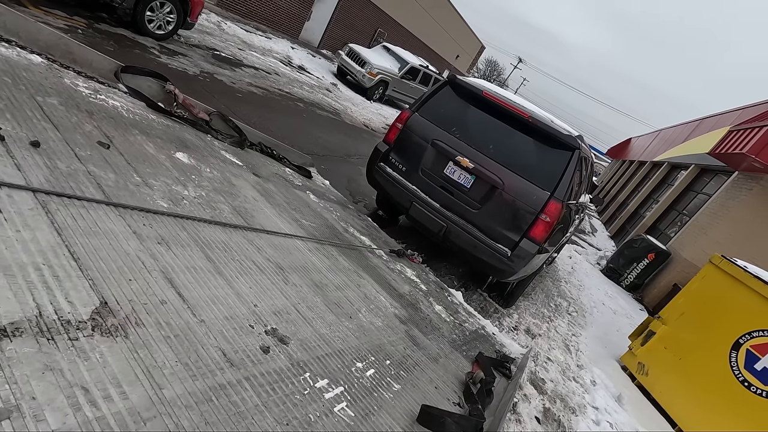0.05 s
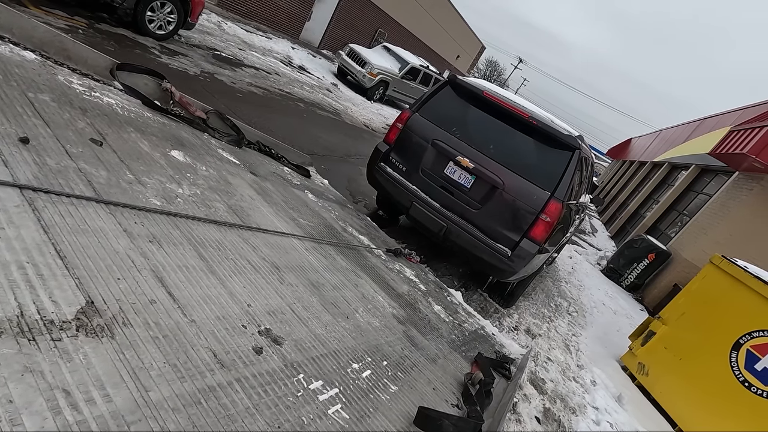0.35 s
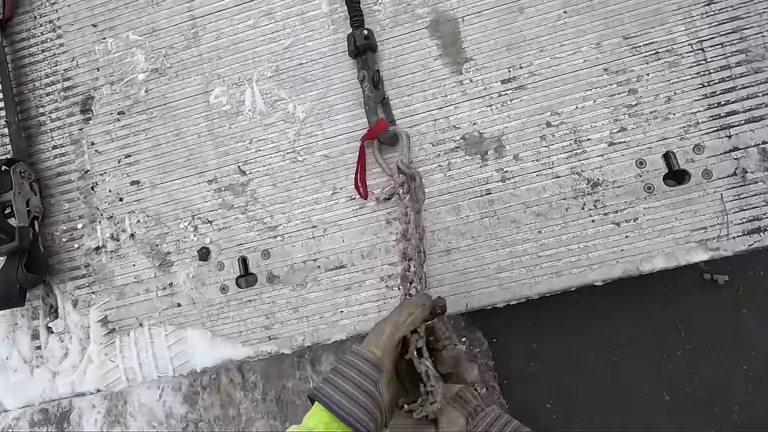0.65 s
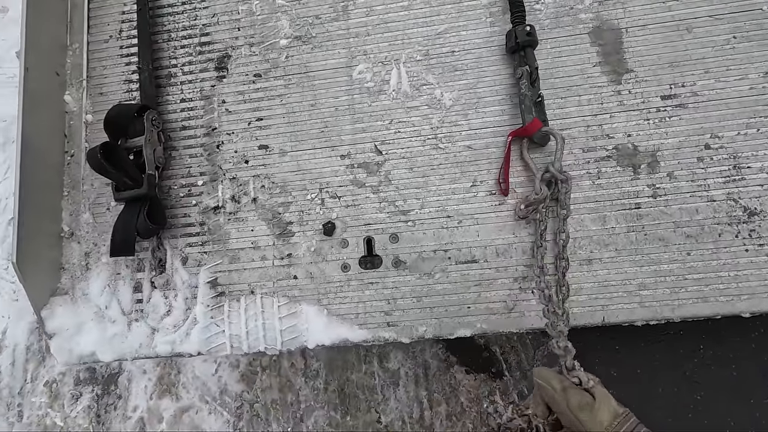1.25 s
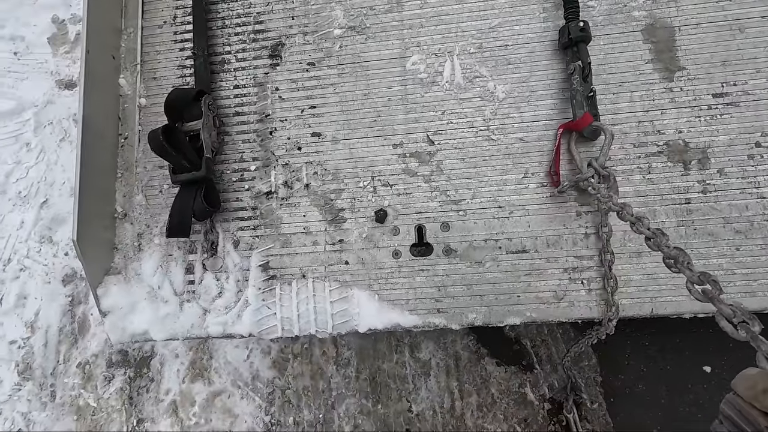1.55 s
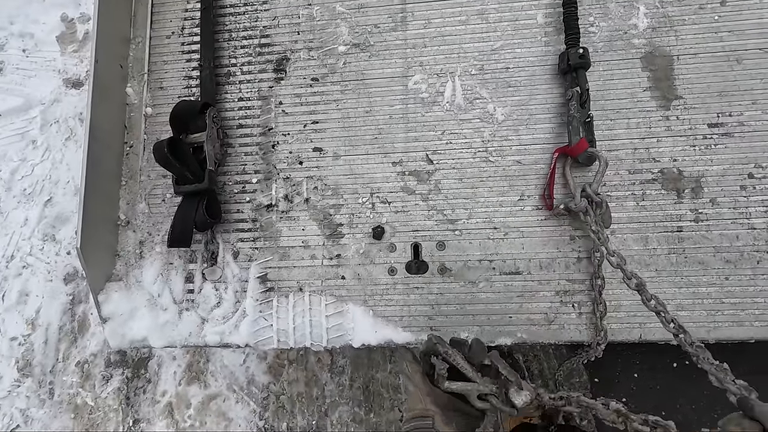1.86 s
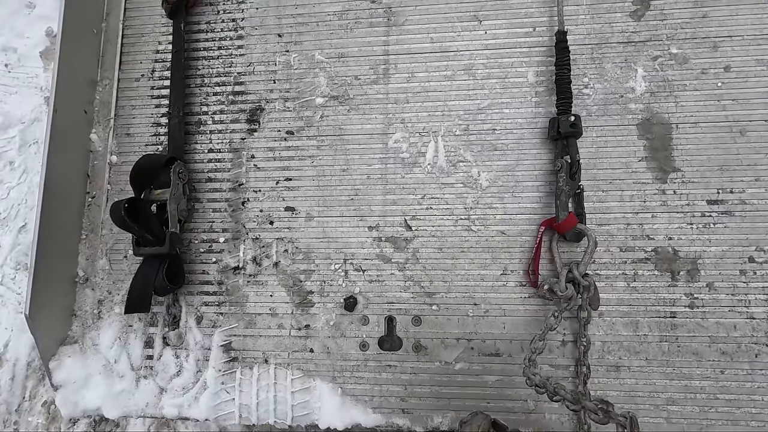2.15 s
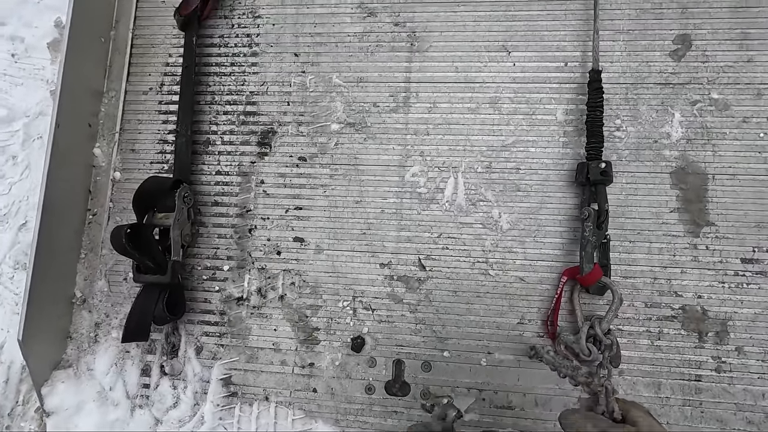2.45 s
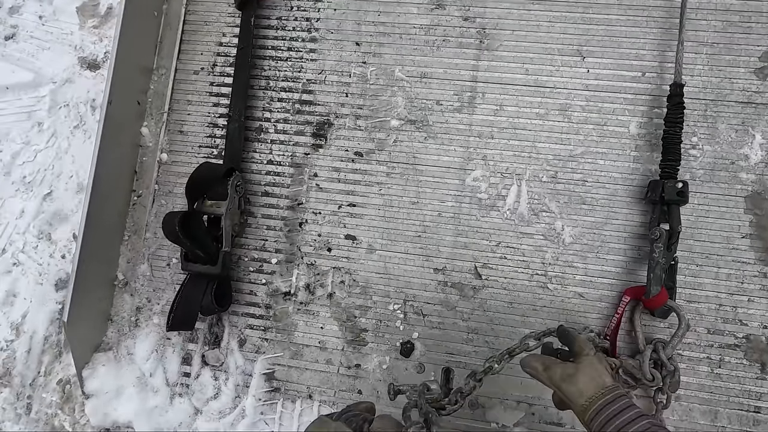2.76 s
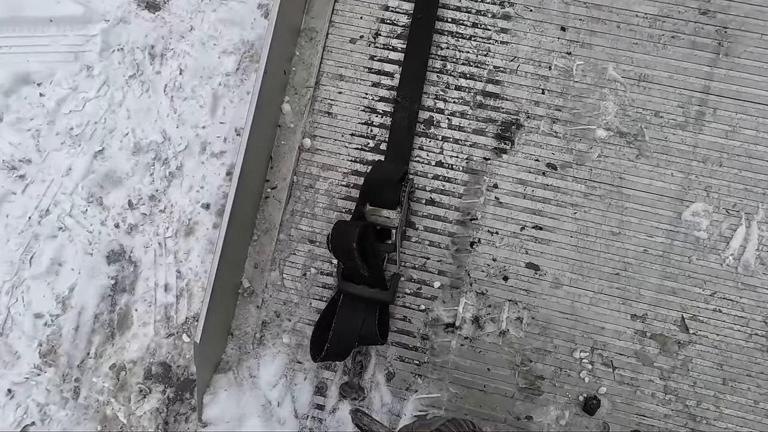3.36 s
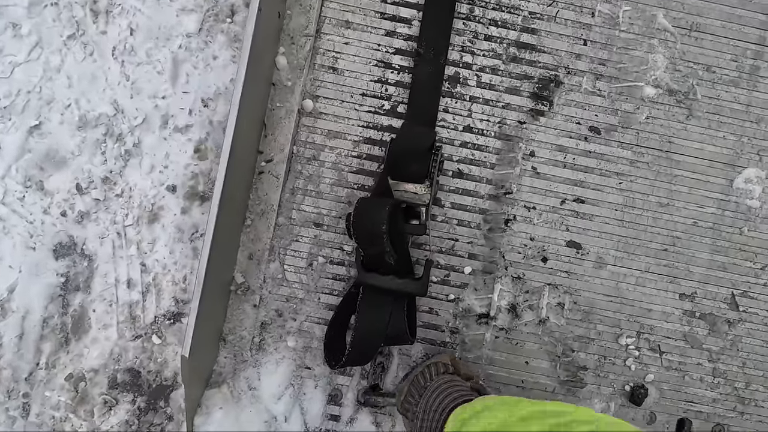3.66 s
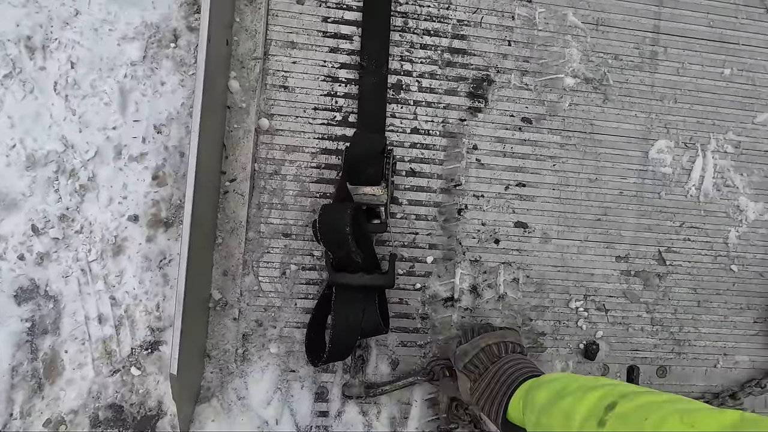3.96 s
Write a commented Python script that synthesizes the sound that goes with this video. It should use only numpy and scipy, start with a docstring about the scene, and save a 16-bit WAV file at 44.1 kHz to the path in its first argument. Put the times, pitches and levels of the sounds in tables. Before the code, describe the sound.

A steel chain clinks and knocks on a truck's metal bed, close by outdoors. A whining pump cuts out at the start, leaving a low engine drone; links ring, slide rattling over the ribbed deck, then clunk down.

```python
"""A steel tie-down chain clinks, knocks and rattles on the ribbed metal bed of an idling truck, outdoors.
Links ring against each other, the hook and slack hit the deck, and the chain slides through gloves
and over the ribs. For the first half second the engine and its whining hydraulic pump are near;
then they drop to a low drone."""
import sys
import numpy as np
from scipy import signal
from scipy.io import wavfile

SR = 44100
rng = np.random.default_rng(int(sys.argv[2]) if len(sys.argv) > 2 else 0)


def wav_record(signal):
    """Record a signal, one row per channel, as 16-bit PCM in the file named by sys.argv[1]."""
    frames = np.transpose(np.atleast_2d(signal))
    bounded = np.clip(frames, -1, 1)
    # unit amplitude maps onto the largest positive 16-bit level
    quanta = np.round(bounded * 32767).astype(np.int16)
    wavfile.write(sys.argv[1], SR, quanta)


N = 176400
TIME_S = np.arange(N) / SR

# Link modes. Each row: frequency in Hz, free T60 in seconds, level in dB struck flat, on edge, at the tip.
LINK_MODES = [(4095, .10, 0, -18, -24), (4280, .09, -22, -4, -18), (4352, .12, -24, -3, -11),
              (5640, .09, -11, -26, -28), (5820, .14, -16, -2, -22), (6605, .14, -9, -15, -22),
              (7860, .13, -7, -19, -14), (8175, .05, -22, -24, -1), (8540, .05, -22, -14, 0),
              (9860, .12, -32, -16, -20), (11180, .13, -24, -24, -26), (14140, .11, -46, -31, -36),
              (15540, .09, -48, -42, -17)]
# Link on link. Each row: start in seconds, level in dB, tilt in dB per octave, blow (flat, edge or tip).
LINK_HITS = [(0.769, -29, 0, "edge"), (0.792, -41, 5, "tip"), (0.926, -36, -14.5, "tip"),
             (1.236, -38, -6.5, "edge"), (1.503, -50, 13.5, "flat"), (1.713, -19.5, -5, "flat"),
             (1.750, -15.5, -5, "edge"), (1.759, -28.5, 6, "edge"), (1.875, -20.5, -17.5, "tip"),
             (1.889, -18, -10.5, "flat"), (1.946, -40, -8, "edge"), (2.166, -29.5, 5, "tip"),
             (2.298, -30, -59, "edge"), (2.570, -49, 17.5, "flat"), (2.734, -31, 5, "flat"),
             (3.099, -17.5, -21, "edge"), (3.102, -25.5, 13, "flat"), (3.653, -27, 1, "tip")]
# Swings of the loose chain. Each row: centre in seconds, spread in seconds, level in dB.
CHAIN_SWINGS = [(0.809, 0.061, -46.5), (2.158, 0.062, -50), (2.858, 0.12, -40.5), (3.698, .03, -44)]
# Hook and slack on the deck. Each row: start in seconds, then mid, bass, treble and top levels in dB.
DECK_KNOCKS = [(0.712, -5.5, -11, -21, -24), (0.726, -1.5, -26, -25.5, -19), (0.739, -8, -8, -36, -37),
               (0.793, -7.5, -9.5, -26, -35), (0.98, -1.5, -14, -18.5, -35), (1.550, -7, -22.5, -38.5, -45),
               (1.759, -3.5, -19, -36.5, -18), (2.9541, -18, -15, -13.5, -5.5),
               (3.66, 2.5, -10.5, -26, -21), (3.696, -11, -34, -24.5, -14.5), (3.727, -3.5, -28, -28, -25),
               (3.782, -0.5, -14.5, -31, -30.5), (3.915, -1.5, -23.5, -37, -53),
               (3.934, -4, -46, -32.5, -31), (3.973, -12.5, -25, -24, -61)]
# Spectrum common to all knocks. Each row: frequency in Hz, gain in dB.
KNOCK_EQ = [(60, -3), (180, 4.5), (350, 1), (800, -11), (1300, -5), (2600, 1.5), (5000, -15.5),
            (9000, -26.5), (14000, -39)]
# Decay of the deck's dense ring. Each row: frequency in Hz, T60 in seconds.
DECK_DECAY = [(100, 0.41), (1200, 0.18), (3000, 0.13), (12000, 0.092)]
# Deck plate modes. Each row: frequency in Hz, gain in dB, T60 in seconds.
PLATE_MODES = [(173.3, -2, 0.17), (184.6, -2.5, 0.15), (770, -31, 0.54), (1260, -12.5, 0.15)]
# Single links on the deck. Each row: start in seconds, treble level in dB, top level in dB.
DECK_TAPS = [(0.59, -24, -18), (0.685, -19, -14.5), (0.882, -18, -27), (2.5477, -11, -21.5),
             (2.5692, -12.5, -22), (2.7503, -10, -20), (2.7883, -13, -15), (2.834, -6.5, -11.5),
             (2.856, -5.5, -12.5), (2.929, -30, -17), (3.0731, -17.5, -18), (3.1313, -13, -11),
             (3.1955, -15, -25), (3.2153, -17.5, -20), (3.4532, -25, -61), (3.6046, -13, -22.5)]
# Spectrum common to all taps. Each row: frequency in Hz, gain in dB.
TAP_EQ = [(150, -14.5), (800, -8.5), (3000, -12), (5000, -10.5), (9000, -26), (14000, -43)]
# Envelope of the chain's slide. Each row: time in seconds, level in dB.
DRAG_LEVEL = [(.67, -56), (.72, -31), (.92, -45), (1.08, -70), (2.73, -80), (2.76, -25), (2.85, -27.5),
              (2.91, -30), (2.98, -28.5), (3.22, -29.5), (3.27, -36.5), (3.55, -75)]
# Spectrum of the slide. Each row: frequency in Hz, relative density in dB.
DRAG_EQ = [(150, 19), (600, 7), (2000, 8.5), (3500, 6), (9000, -21), (15500, -24)]
# Engine orders and pump whine. Each row: frequency in Hz, near level in dB, far level in dB.
TRUCK_TONES = [(60.34, -32.5, -34.5), (68.5, -31, -40.5), (118, -71, -35), (150.1, -34, -44.5),
               (284, -26.5, -33), (470, -31.5, -64.5), (568.6, -36, -42.5), (956, -30, -52.5)]
# Pump resonances. Each row: centre in Hz, width in Hz, level in dB.
PUMP_BANDS = [(933, 120, -29.5), (1395, 87, -41.5), (1955, 71, -42.5), (2590, 770, -41.5), (7080, 920, -58),
              (9300, 9900, -62)]
# Near rumble. Each row: frequency in Hz, relative density in dB.
NEAR_EQ = [(15, -48), (25, -6), (64, 0), (250, -4.5), (673, -15), (1100, -17), (2780, -26.5), (15000, -106)]
# Far rumble. Each row: frequency in Hz, relative density in dB.
FAR_EQ = [(15, -31), (25, -2), (125, -4), (243, -12.5), (420, -13), (573, -20), (879, -19), (3830, -36.5),
          (15000, -85)]

BAND_EDGES_HZ = 22 * 2 ** np.arange(0, 9.7, 1 / 3)
NEIGHBOUR_DETUNE = 0.046


def clinks(chatter_s=0.0036, chatter_loss_db=3, chatter_detune=0.0037, jostle_s=0.007, jostle_db=-13.5):
    """A struck link chatters in the modes the blow favours and jostles its detuned neighbours."""
    out = np.zeros(N + SR)
    hz, t60_s, flat_db, edge_db, tip_db = np.transpose(LINK_MODES)
    blow_db = {"flat": flat_db, "edge": edge_db, "tip": tip_db}
    for start_s, db, tilt_db, blow in LINK_HITS:
        gains = from_db(db + blow_db[blow] + tilt_db * np.log2(hz / hz[0]))
        chatter = [(chatter_s * k * (1 + rng.random() / 2), -chatter_loss_db * k, chatter_detune)
                   for k in range(4)]
        jostle = [(rng.exponential(jostle_s), jostle_db, NEIGHBOUR_DETUNE) for _ in range(7)]
        for delay_s, touch_db, detune in chatter + jostle:
            wave = link_ring(hz, t60_s, gains * from_db(touch_db), detune)
            start = int((start_s + delay_s) * SR)
            out[start:start + len(wave)] += wave
    return out[:N]


def link_ring(hz, t60_s, gains, detune, glove_t60_ratio=0.64, tick_db=-9.5):
    """One touch: glove-damped link modes plus a contact tick."""
    t = TIME_S[:SR // 5]
    tuned_hz = hz * (1 + detune * rng.standard_normal(len(hz)))
    decay = np.exp(-np.log(1000) * t / (glove_t60_ratio * t60_s[:, None]))
    modes = np.sin(2 * np.pi * (tuned_hz[:, None] * t + rng.random((len(hz), 1)))) * decay
    tick = band(rng.standard_normal(len(t)), 2300, 8000) * np.exp(-t / 0.0029)
    attack = 1 - np.exp(-t / 0.00045)
    return (gains @ modes + 2 * from_db(tick_db) * np.linalg.norm(gains) * tick) * attack


def knocks(gain_db=13, crack_t60_s=0.011, tail_db=-5, push_db=19, hook_db=5.5):
    """Hook and slack land: a sharp push and a crack, then the deck rings and the hook sounds a few damped
    tones."""
    start_s, mid_db, bass_db, treble_db, top_db = np.transpose(DECK_KNOCKS)

    def envelope(hz):
        db = [np.interp(np.log(hz), np.log([250, 800, 2500, 6000]), row)
              for row in zip(bass_db, mid_db, treble_db, top_db)]
        hits = clicks(start_s, from_db(np.array(db) + at_hz(KNOCK_EQ, hz) + gain_db))
        return hit_decay(hits, crack_t60_s) + from_db(tail_db) * hit_decay(hits, at_hz(DECK_DECAY, hz))

    plate = 0
    for k, (hz, db, t60_s) in enumerate(PLATE_MODES):
        sizes = from_db(bass_db + db + rng.standard_normal(len(start_s)))
        plate += (-1) ** k * ring(clicks(start_s, sizes), hz, t60_s)
    push = band(clicks(start_s, from_db(treble_db + push_db)), 400, 3500)
    return banded_noise(envelope) + plate + push + metal_tones(start_s, treble_db + hook_db)


def taps(gain_db=14, tick_t60_s=0.0024, tail_db=-8.5, tail_t60_s=0.12):
    """Single links hit the deck lightly: a dry tick, a short tail, a few damped tones."""
    start_s, treble_db, top_db = np.transpose(DECK_TAPS)

    def envelope(hz):
        db = [np.interp(np.log(hz), np.log([2500, 6000]), row) for row in zip(treble_db, top_db)]
        hits = clicks(start_s, from_db(np.array(db) + at_hz(TAP_EQ, hz) + gain_db))
        return hit_decay(hits, tick_t60_s) + from_db(tail_db) * hit_decay(hits, tail_t60_s)

    return banded_noise(envelope) + metal_tones(start_s, treble_db)


def metal_tones(starts_s, levels_db, range_hz=(1574, 3920), t60_s=0.034, gain_db=-10):
    """Three damped tones, different at every hit."""
    out = 0
    for start_s, db in zip(starts_s, levels_db):
        hit = clicks([start_s], [from_db(db + gain_db)])
        for k, hz in enumerate(rng.uniform(*range_hz, size=3)):
            out += (-1) ** k * ring(hit, hz, t60_s)
    return out


def drag(contacts_per_s=400, rattle_t60_s=0.032, rib_range_hz=(890, 3520), rib_t60_s=0.055, rib_db=-3.5):
    """Links trip over the ribs: dense contacts, each with its own spectrum and short ring."""
    count = int(contacts_per_s * N / SR)
    start_s = rng.uniform(0, N / SR, count)
    size_db = 3.6 * np.minimum(rng.exponential(1, count), 3.5)

    def envelope(hz):
        db = size_db + at_hz(DRAG_EQ, hz) + 5 * rng.standard_normal(count)
        return hit_decay(clicks(start_s, from_db(db)), rattle_t60_s)

    rattle = banded_noise(envelope)
    ribs = sum(ring(clicks(start_s, from_db(size_db) * rng.standard_normal(count) ** 3), hz, rib_t60_s)
               for hz in rng.uniform(*rib_range_hz, size=36))
    level = from_db(np.interp(TIME_S, *np.transpose(DRAG_LEVEL)))
    return (unit_rms(rattle) + from_db(rib_db) * unit_rms(ribs)) * level


def jingle(touches_per_swing=14):
    """Loose links brush as the chain swings, each pinging faintly at its own pitch."""
    out = np.zeros(N + SR)
    hz, t60_s, _, _, tip_db = np.transpose(LINK_MODES)
    for centre_s, spread_s, db in CHAIN_SWINGS:
        for _ in range(touches_per_swing):
            start = int(rng.normal(centre_s, spread_s) * SR)
            wave = link_ring(hz, t60_s, from_db(db + tip_db / 2), NEIGHBOUR_DETUNE)
            out[start:start + len(wave)] += wave
    return out[:N]


def truck(pump_stop_s=0.56, fade_s=0.011, settle_s=0.12, speed_wander=0.0029):
    """Engine and pump share one wavering speed; the sound settles to a drone when the pump stops."""
    near = np.clip((pump_stop_s - TIME_S) / fade_s + 0.5, 0, 1)
    settle_db = 6.5 * (1 - near) * np.exp(-np.abs(TIME_S - pump_stop_s) / settle_s)
    engine_time_s = np.cumsum(1 + speed_wander * drift(1.9)) / SR
    return hum(engine_time_s, near, settle_db) + near * pump(engine_time_s) + rumble(near, settle_db)


def hum(engine_time_s, near, settle_db, flutter_db=2.5, dip_hz=284, dip_s=2.597, dip_width_s=0.37):
    """Engine orders and pump whine flutter in level; the drone's strongest tone dips briefly."""
    dip_db = -15.5 * np.exp(-((TIME_S - dip_s) / dip_width_s) ** 2)
    out = 0
    for hz, near_db, far_db in TRUCK_TONES:
        db = far_db + near * (near_db - far_db) + settle_db + flutter_db * drift(2)
        if hz == dip_hz:
            db += dip_db
        out += np.sqrt(2) * from_db(db) * np.sin(2 * np.pi * (hz * engine_time_s + rng.random()))
    return out


def pump(engine_time_s, throb_hz=22.9, throb_depth=0.37):
    """Noise in the pump's resonances surges and fades with each engine turn."""
    throb = np.exp(-throb_depth * (throb_hz * engine_time_s % 1))
    out = 0
    for hz, width_hz, db in PUMP_BANDS:
        resonance = band(throb * rng.standard_normal(N), hz - width_hz / 2, hz + width_hz / 2)
        out += from_db(db) * unit_rms(resonance)
    return out


def rumble(near, settle_db, near_db=-25.5, far_db=-29.5, flicker_db=1.5):
    """Engine noise: steady while near, then quieter with flickering bands."""
    close = unit_rms(banded_noise(lambda hz: from_db(at_hz(NEAR_EQ, hz))))
    distant = unit_rms(banded_noise(lambda hz: from_db(at_hz(FAR_EQ, hz) + flicker_db * drift(8.3))))
    return near * from_db(near_db) * close + (1 - near) * from_db(far_db + settle_db) * distant


def hit_decay(hits, t60_s, skid_s=0.0021):
    """Envelope of hits: energy builds while a link skids, adds up and dies away."""
    contact = np.hanning(int(skid_s * SR))
    energy = np.convolve(hits ** 2, contact / contact.sum(), "same")
    return np.sqrt(signal.lfilter([1], [1, -1e-6 ** (1 / (t60_s * SR))], energy + 1e-18))


def ring(hits, hz, t60_s):
    """One mode: a unit click starts a decaying unit sine."""
    radius, angle = 1e-3 ** (1 / (t60_s * SR)), 2 * np.pi * hz / SR
    return signal.lfilter([0, np.sin(angle)], [1, -2 * radius * np.cos(angle), radius ** 2], hits + 1e-18)


def clicks(times_s, sizes):
    """Single-sample impulses."""
    return np.bincount(np.clip(np.asarray(times_s) * SR, 0, N - 1).astype(int), sizes, N)


def banded_noise(gain_at):
    """Third-octave noise bands, each scaled by gain_at(hz) before its filter."""
    white = rng.standard_normal((2, N))
    return sum(band(white[k % 2] * gain_at(np.sqrt(low_hz * high_hz)), low_hz, high_hz)
               for k, (low_hz, high_hz) in enumerate(zip(BAND_EDGES_HZ, BAND_EDGES_HZ[1:])))


def band(x, low_hz, high_hz):
    return signal.sosfilt(signal.butter(2, [low_hz, high_hz], "band", fs=SR, output="sos"), x)


def drift(rate_hz, hop=40):
    """Slow random motion, unit RMS."""
    pole = np.exp(-2 * np.pi * hop * rate_hz / SR)
    slow = signal.lfilter([1], [1, -2 * pole, pole ** 2], rng.standard_normal(N // hop + 2002))[2000:]
    return np.interp(np.arange(N) / hop, np.arange(len(slow)), unit_rms(slow))


def at_hz(table, hz):
    """Table lookup on a log-frequency axis."""
    table_hz, values = np.transpose(table)
    return np.interp(np.log(hz), np.log(table_hz), values)


def from_db(db):
    return 10 ** (np.asarray(db) / 20)


def unit_rms(x):
    return x / np.sqrt(np.mean(x ** 2) + 1e-20)


def scene():
    """Chain and truck at the worker's head, mono."""
    return (clinks() + jingle() + knocks() + taps() + drag() + truck())[None]


def record(dry, mic_top_hz=11000, ceiling=1.2, cutoff_hz=15750):
    """Microphone roll-off, rounded peaks, steep treble cut."""
    dull = signal.sosfilt(signal.butter(2, mic_top_hz, fs=SR, output="sos"), dry)
    rounded = ceiling * np.tanh(dull / ceiling)
    return signal.sosfilt(signal.ellip(10, 0.1, 80, cutoff_hz, fs=SR, output="sos"), rounded)


dry = scene()
out = record(dry)
wav_record(out)
```